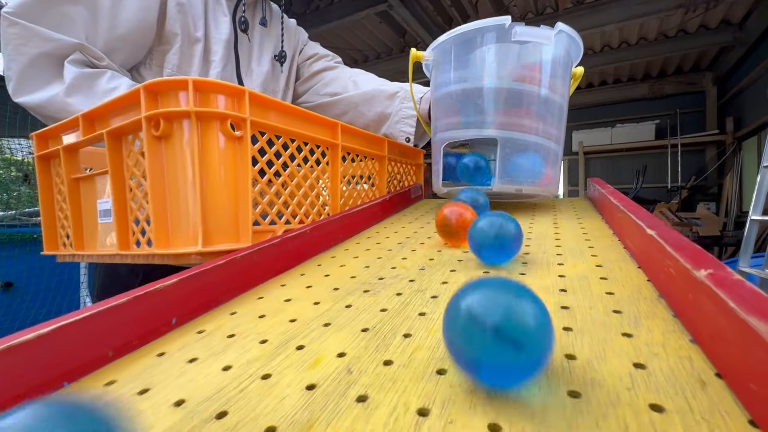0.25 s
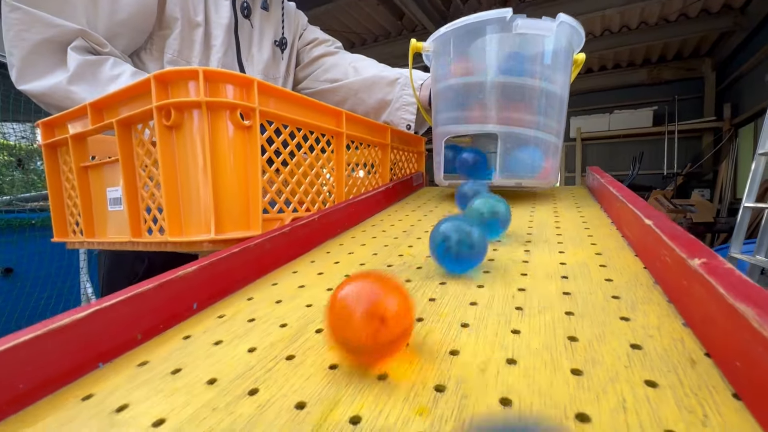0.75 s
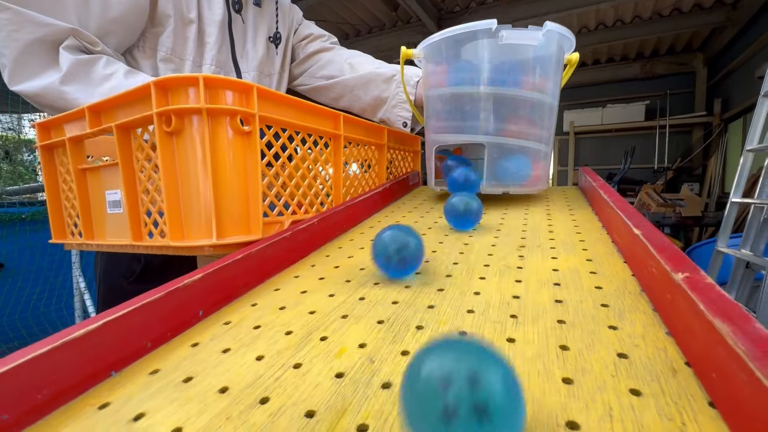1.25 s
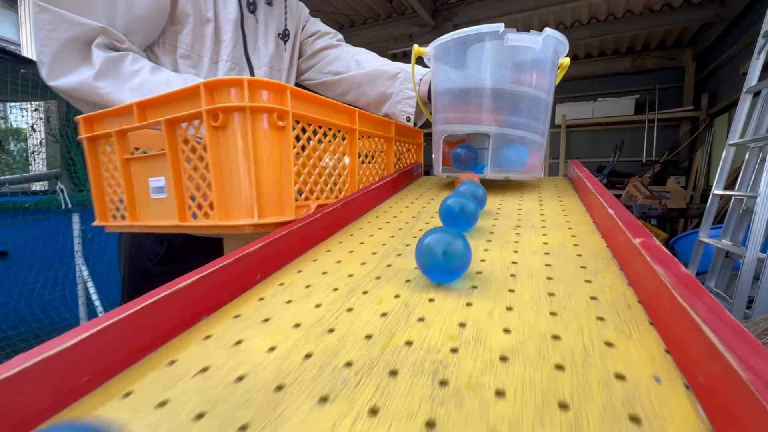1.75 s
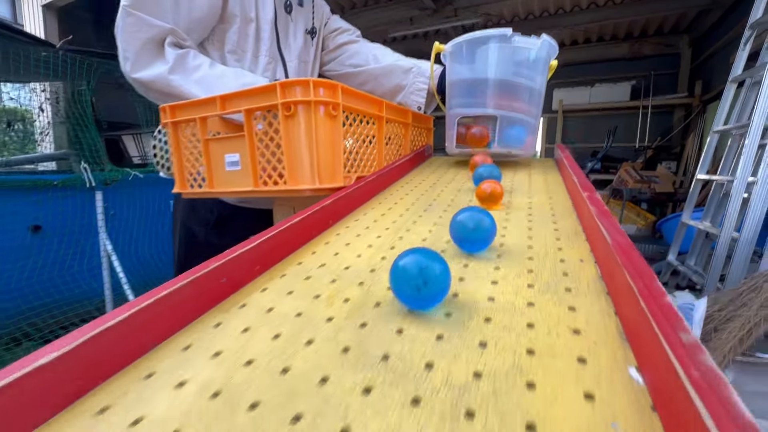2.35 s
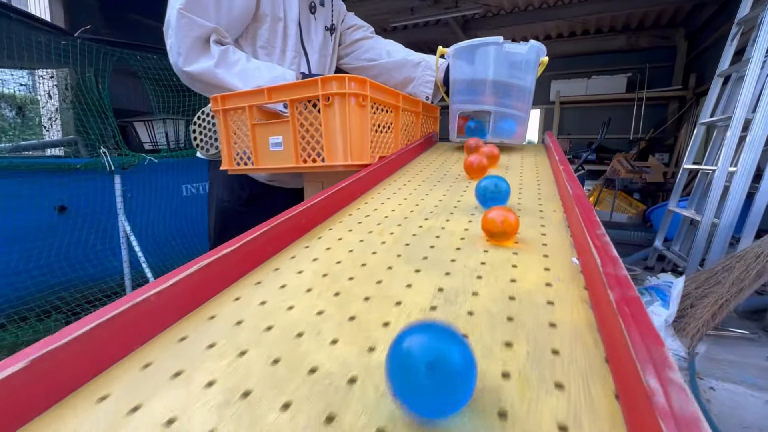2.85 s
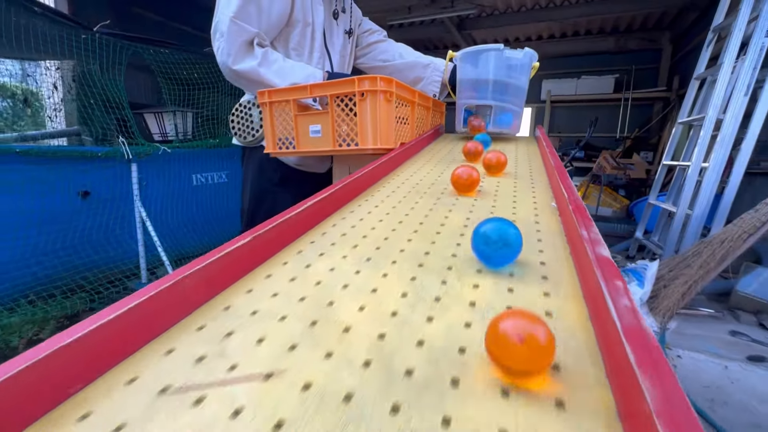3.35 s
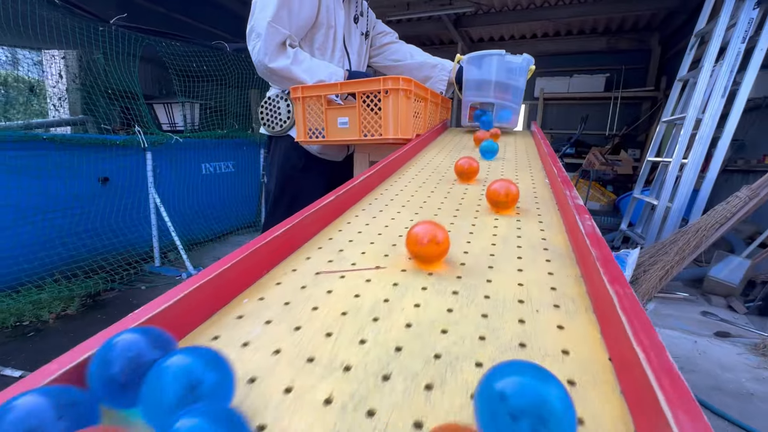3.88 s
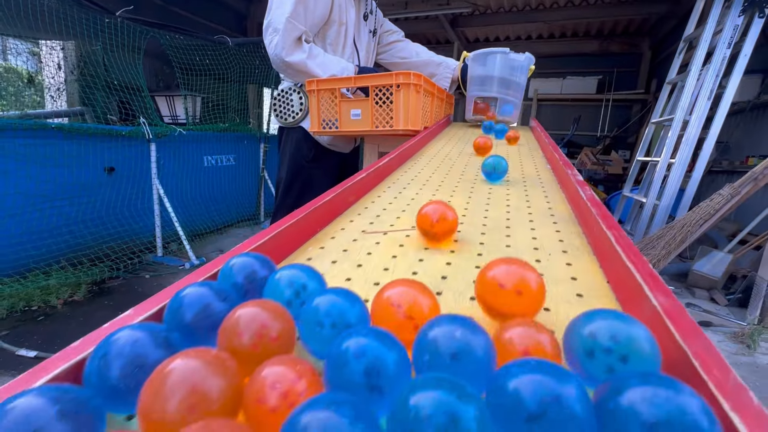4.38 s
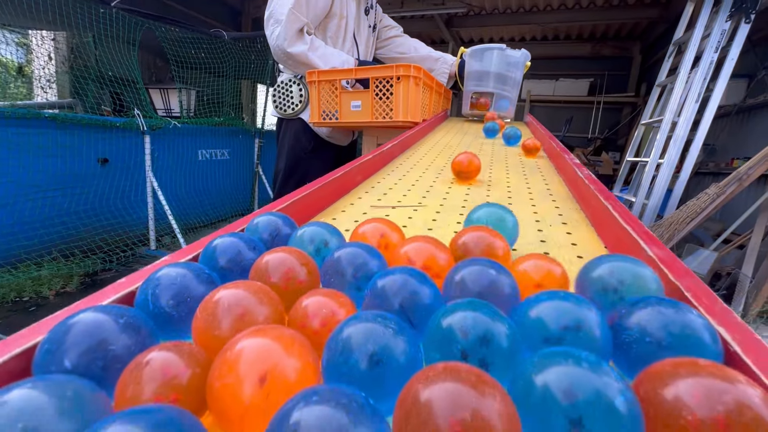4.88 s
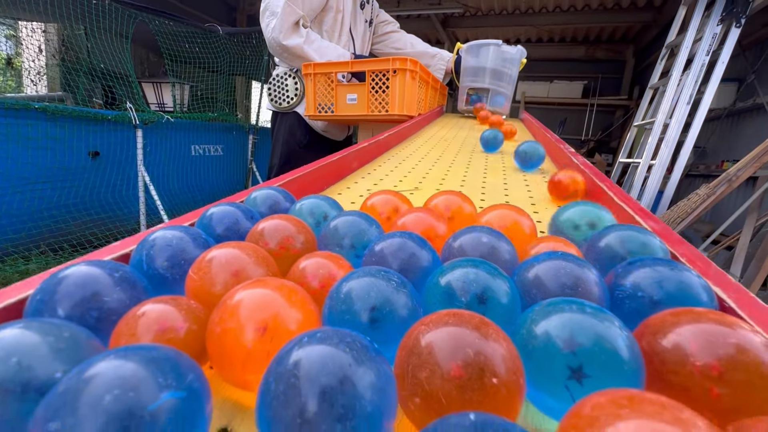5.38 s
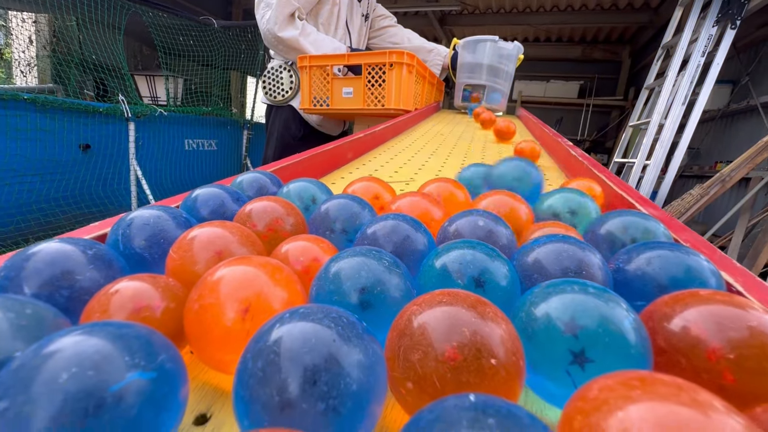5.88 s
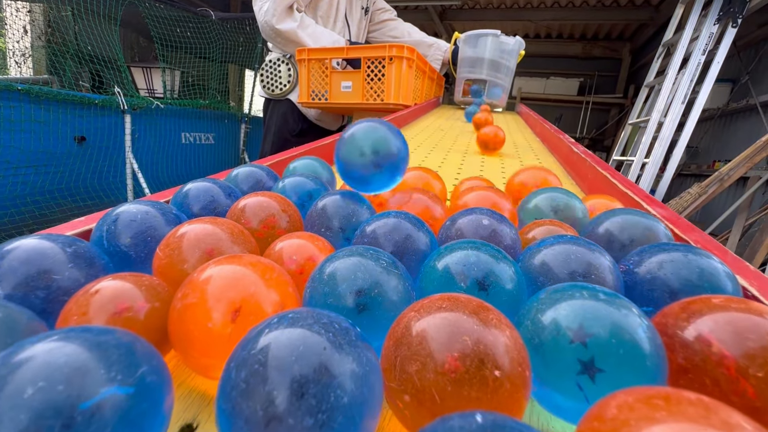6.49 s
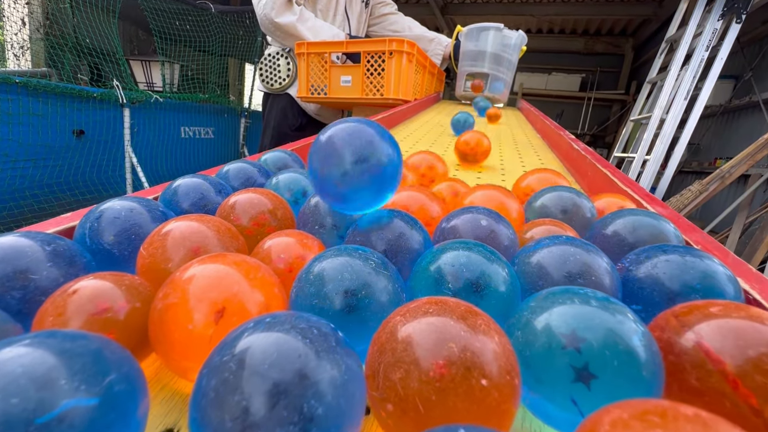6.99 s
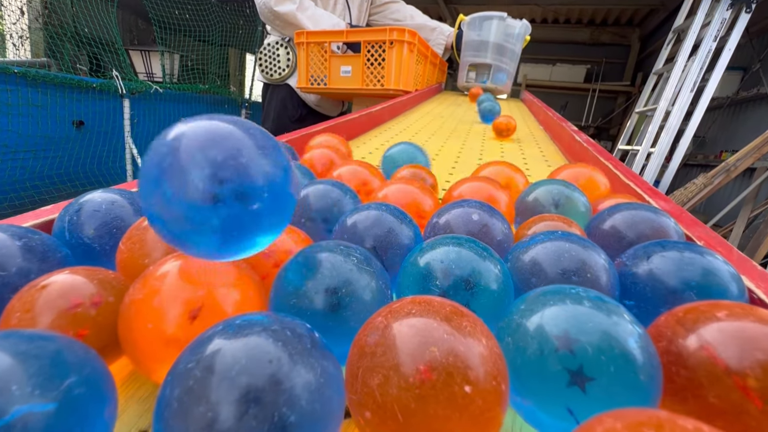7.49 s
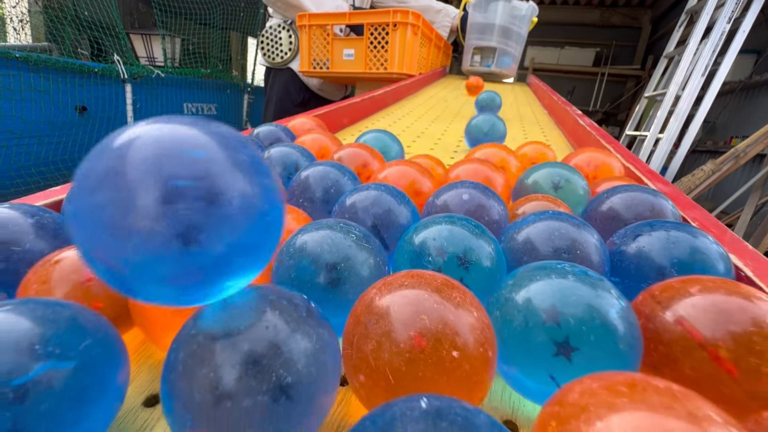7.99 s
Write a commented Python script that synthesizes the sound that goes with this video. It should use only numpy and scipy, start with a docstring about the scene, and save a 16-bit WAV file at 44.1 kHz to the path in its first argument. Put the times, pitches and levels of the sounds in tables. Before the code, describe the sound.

Close stereo sound of plastic balls tumbling down a wooden ramp in a shed. At first there are brighter ticks, thuds on bare board and audible rolling over holes; later, denser clusters of dull clacks as balls hit the packed heap. The rumble thins out, leaving knocks, and near the end a ball softly nudges the microphone.

```python
"""Dull clacks come in quick runs, each with a tick and a thud, as solid plastic balls roll down a
perforated board and knock into the heap at its foot, close to a small camera with two microphone ports.
A blow is a train of damped tones from touching balls, and its push excites the board's resonances.
Lone pairs of balls meet with a hollow clack; hard faces crack as short bursts of coloured noise.
Underneath, filtered noise and small contacts rumble and rattle as balls roll over the holes; a shed answers."""
import sys
import numpy as np
from scipy import signal
from scipy.fft import rfft, irfft, next_fast_len
from scipy.io import wavfile
from scipy.ndimage import uniform_filter1d, minimum_filter1d, map_coordinates

SR = 44100
rng = np.random.default_rng(int(sys.argv[2]) if len(sys.argv) > 2 else 0)


def wrap_up_sound(samples):
    """Save the sound to the file named by the first command line argument, as 16-bit audio."""
    columns = np.atleast_2d(samples).T
    # keep every value between -1 and 1, then stretch to whole-number steps
    tamed = np.clip(columns, -1, 1)
    steps = np.round(tamed * 32767).astype(np.int16)
    wavfile.write(sys.argv[1], SR, steps)


def elevation(decibels):
    """Turn decibel levels (scalar or array-like) into linear amplitude ratios."""
    levels = np.asarray(decibels, float)
    return 10 ** (levels / 20)


N = 363384

# Spectrum of hard faces meeting. Each row: frequency in Hz, relative spectral level in dB.
TICK_COLOUR = [(1200, -3), (2200, 3), (3300, -6.5), (4800, -15.5), (5700, -24), (7000, -20.5), (8300, -25),
               (9600, -33.5), (10200, -84.5)]


def knocks():
    """Superposition: two independent views of every jolt and tick, partly coherent at the ports."""
    # Jolts through the whole heap. Each row: start in seconds, clack level in dB,
    # thud level in dB over the clack, length in ms.
    jolts = [(0.039, -10, 0.5, 25.2), (0.212, -6.5, 1, 23.8), (0.505, -8.5, -1, 23), (0.754, -6.5, 3, 17.2),
             (1.036, -10, 1, 21.5), (1.319, -13.5, -0.5, 22.4), (1.558, -16, 3.5, 23.8),
             (1.777, -9, -2.5, 23.7), (1.825, -9.5, 0.5, 24.2), (2.023, -22, 7, 27.6),
             (2.08, -4.5, -8.5, 20.5), (2.346, -12, -4, 23.5), (2.579, -14, -6, 24),
             (2.83, -9.5, -2.5, 20.5), (3.129, -9.5, -1.5, 26.4), (3.223, -20.5, 5.5, 29.6),
             (3.297, -6, -7.5, 19.4), (3.332, -21, 8.5, 40.4), (3.421, -11.5, -0.5, 26.6),
             (3.609, -13, 1, 13.6), (3.723, -8, -4.5, 28), (3.956, -11, -2.5, 25.5), (4.14, -7, -2, 22.6),
             (4.176, -13, 2, 39), (4.228, -8.5, -1, 21.6), (4.332, -4, -1.5, 24.3), (4.471, -7, -3.5, 16.2),
             (4.504, -12.5, 7, 12), (4.541, -8.5, -7.5, 26.4), (4.569, -11.5, -0.5, 16.7),
             (4.619, -14, -1.5, 20), (4.761, -6, -4.5, 17.7), (4.846, -7, -2.5, 11.7),
             (4.928, -18, 3.5, 30.3), (5.099, -6, -5.5, 18.7), (5.249, -13, -1.5, 26),
             (5.431, -5, -7, 19.7), (5.595, -17.5, -1.5, 32.4), (5.649, -6, -7, 18.8),
             (5.789, -8, -5, 21.6), (5.833, -14, -4, 19), (5.893, -13, 1.5, 30.4), (5.944, -8.5, -3, 16.4),
             (6.123, -4, -8, 17), (6.208, -12, 1, 14.9), (6.239, -13.5, -2, 13.8), (6.398, -5.5, -2, 31.4),
             (6.514, -5.5, -11.5, 13.8), (6.53, -12, 1, 27.8), (6.573, -14, 2.5, 15.2),
             (6.741, -6, -13, 16.9), (6.833, -9.5, -5, 15.7), (6.87, -15, 2.5, 32), (6.91, -13.5, 3, 24),
             (7.128, -14.5, 4, 15.4), (7.169, -3, -6.5, 13.3), (7.296, -22.5, 7, 13.6),
             (7.329, -16, -2.5, 11.7), (7.366, -11.5, 2, 14.4), (7.5, -11.5, 2.5, 21),
             (7.569, -13.5, -2, 22.3), (7.753, -15, 4.5, 13), (7.875, -17, 1.5, 13),
             (8.1138, -5.5, -4.5, 10.2), (8.178, -23.5, 4.5, 32)]
    s, db, thud_db, length_ms = np.transpose(jolts)
    note_hz = heap(s)[1]
    view = lambda: jolt(s, db, note_hz, thud_db, length_ms) + ticks()
    return paired(view(), view())


def jolt(s, db, hz, thud_db, length_ms, count=9):
    """Impulse transfer: a jolt swells from ball to ball, then the heap settles in weaker contacts."""
    draw = rng.standard_normal((len(s), 3, count))
    # place of each contact along the jolt; below 0 leads in
    share = (np.arange(count) + rng.random((len(s), count))) / 6 - 0.25
    share = np.where(share > 0.7, 0.69 + 2.3 * (share - 0.7), share)  # the last contacts straggle
    spread_s = np.clip(length_ms - 3, 1, 80)[:, None] / 1000
    times = (s[:, None] + share * spread_s).ravel()
    swell_db = np.where(share < 0.25, -25 * (0.25 - share), -7 * np.abs(share - 0.25))
    sizes = elevation(swell_db + 1.65 * draw[:, 0])
    # the contacts share the blow's energy; a long jolt holds more of it
    blow_db = db + 5.4 * np.log10(length_ms / 15)
    sizes *= elevation(blow_db)[:, None] / np.linalg.norm(sizes, axis=1, keepdims=True)
    # a long jolt involves the whole heap and scatters its note
    loose = np.clip(length_ms / 25, 0, 1)[:, None]
    pitch = np.clip(hz[:, None] * np.exp(0.32 * loose * draw[:, 1]), 450, 2300)
    pitch[:, 2] = hz  # the third contact takes the heap's note and gains weight
    sizes[:, 2] *= elevation(6.0 - 4.3 * loose[:, 0])
    shapes = tones(pitch.ravel(), cycles=1.183, soft=0.45)
    clack = laid(times, elevation(16.0) * sizes.reshape(-1, 1) * shapes)
    # the heavy push reaches the board 1.5 ms later, either way up
    force = sizes * elevation(thud_db + 14)[:, None] * np.sign(draw[:, 2])
    push = np.hanning(SR // 900) * force.reshape(-1, 1)
    thud = board(laid(times + 0.0015, push))
    return clack + thud + rasp(s, db, length_ms)


def heap(s):
    """Growing load: share of the board covered (0-1) and note of the heap's contacts (Hz) at times s."""
    # Each row: time in seconds, share of the board covered (0-1), note of the heap in Hz.
    growth = [(0, 0, 1253), (2.801, 0.4, 1310), (4.202, 0.83, 1072), (8.24, 0.87, 1055)]
    at, share, hz = np.transpose(growth)
    return np.interp(s, at, share), np.interp(s, at, hz)


def board(push):
    """Modal resonance: causal damped modes of the board, reweighted as the heap covers it."""
    # Each row: resonance in Hz, bandwidth in Hz, level in dB when bare, level in dB when covered.
    modes = [(164, 108, -5.5, -10), (324.5, 154, -6, 3), (367.8, 61, -3.5, 7.5), (539, 184, 0.5, -3),
             (813, 190, -6.5, -4), (78, 21, -5.5, -14)]

    def response(f, column):
        total = 0
        for k, row in enumerate(modes):
            hz, width = row[:2]
            mode = 1j * f * width / (hz ** 2 - f * f + 1j * f * width)
            total = total + (-1) ** k * elevation(row[column]) * mode
        return total

    covered = heap(np.arange(N) / SR)[0]
    bare_ring = filtered(push * (1 - covered), lambda f: response(f, 2))
    covered_ring = filtered(push * covered, lambda f: response(f, 3))
    return bare_ring + covered_ring


def ticks():
    """Broadband impact: hard faces meet in a crack of noise, then a duller rasp."""
    # Each row: start in seconds, treble level in dB.
    contacts = [(0.036, -24), (0.184, -39.5), (0.2117, -21), (0.3105, -38.5), (0.5047, -23), (0.674, -40),
                (0.7537, -27), (0.916, -43.5), (0.382, -40), (1.031, -36.5), (1.319, -41.5), (1.556, -39.5),
                (1.6718, -43), (1.7722, -31.5), (1.8277, -42.5), (1.9092, -39.5), (2.077, -32.5),
                (2.146, -43.5), (2.347, -37), (2.517, -47.5), (2.5788, -41), (2.8227, -36), (3.1294, -36),
                (3.2994, -31), (3.4212, -35.5), (3.6662, -39.5), (3.724, -42), (3.761, -35.5),
                (3.7687, -35), (3.9554, -41), (4.33, -36), (4.4678, -42), (4.503, -46), (4.768, -41),
                (4.8461, -40), (5.097, -39.5), (5.4299, -37), (5.7947, -36.5), (5.8794, -44),
                (6.127, -39.5), (6.3974, -33.5), (6.7436, -43.5), (7.166, -37), (7.88, -42.5),
                (8.1086, -35), (8.198, -52)]
    s, db = np.transpose(contacts)
    body_db, rasp_ms = 29.5, 16.4  # whole tick over its treble; time in which the rasp falls 16 dB
    t = np.arange(SR // 16) / SR

    def burst(fade):
        noise = rng.standard_normal((len(s), len(t)))
        return laid(s, elevation(db + body_db)[:, None] * noise * fade * (1 - np.exp(-t / 0.0013)))

    crack = filtered(burst(elevation(-60 * t / 0.013)), lambda f: elevation(along(TICK_COLOUR, f)))
    return crack + 0.5 * filtered(burst(elevation(-16 * t / (rasp_ms / 1000))), raspy)


def rasp(s, db, length_ms):
    """Contact friction: noise under a blow, falling 16 dB over the blow's length."""
    rasp_db = -10.5  # against the clack's level
    t = np.arange(SR // 16) / SR
    fade = elevation(-16 * t / (length_ms[:, None] / 1000))
    burst = rng.standard_normal(fade.shape) * fade * (1 - np.exp(-t / 0.0017))
    return filtered(laid(s, elevation(db + rasp_db)[:, None] * burst), raspy)


def raspy(f):
    """First-order low-pass: a rasp has the tick's colour, dulled above 3300 Hz."""
    return elevation(along(TICK_COLOUR, f)) / (1 + 1j * f / 3300)


def clacks(count=3):
    """Repeated impact: a hollow contact and rebounds reach both ports alike; thuds and rasps differ."""
    # Single ball against ball. Each row: start in seconds, clack level in dB, pitch in Hz.
    pairs = [(0.2565, -10.5, 1890), (0.2608, -6.5, 1367), (0.384, -25.5, 2250), (0.7157, 0.5, 1707),
             (0.9524, -4, 1790), (1.1464, -6, 1695), (1.1665, -4, 1293), (1.4563, -16.5, 1406),
             (2.1, -8, 1450), (2.2082, -6.5, 1940), (2.2506, -8.5, 1276), (2.2597, -8.5, 1970),
             (2.4256, -5.5, 1414), (2.8859, -14.5, 1324), (2.9027, -6.5, 1277), (2.915, -7, 1760),
             (3.165, -8, 1760), (3.2016, -11, 1326), (3.669, -8.5, 1660), (3.7604, -8, 1510),
             (3.7707, -3.5, 1436), (3.914, -8.5, 710), (5.2167, -8, 1496), (5.5177, -5.5, 1550),
             (5.6743, -8.5, 1580), (5.884, -8, 1536), (6.051, -12, 945), (6.463, -9, 1013),
             (7.21, -9, 1490), (7.523, -11.5, 1650), (8.1112, -6, 1686)]
    s, db, hz = np.transpose(pairs)
    rebound_s, rebound_db = 0.003, -5  # typical wait for a rebound; change of level at each
    draw, k = rng.standard_normal((len(s), 2, count)), np.arange(count)
    times = (s[:, None] + k * rebound_s * np.exp(0.2 * draw[:, 0])).ravel()
    sizes = elevation(db[:, None] + k * rebound_db).reshape(-1, 1)
    # rebounds tend to sound duller
    pitch = (hz[:, None] * np.exp(k * (0.12 * draw[:, 1] - 0.08))).ravel()
    overtone = elevation(-12) * tones(1.75 * pitch, cycles=3, soft=3)
    hollow = tones(pitch, cycles=2, soft=1.8) + overtone
    ring = laid(times, elevation(14.5) * sizes * hollow)
    thud_db = np.interp(heap(times)[0], (0, 1), (-12.5, -3))  # bare board to covered board

    def view():
        way = np.sign(rng.standard_normal(sizes.shape))
        push = np.hanning(SR // 1100) * sizes * elevation(thud_db + 13.5)[:, None] * way
        return board(laid(times + 0.002, push)) + rasp(s, db + 1.5, np.full(len(s), 10))

    return ring + paired(view(), view())


def tones(hz, cycles, soft):
    """Damped oscillation (rows): swells over soft cycles as the plastic gives, decays over cycles."""
    u = np.arange(SR // 70) / SR * hz[:, None]
    return np.sin(2 * np.pi * u) * np.exp(-u / cycles) * (1 - np.exp(-u / soft)) ** 2


def bump():
    """Damped oscillation: a ball nudges the camera body, one slow swing."""
    start_s, level_db, swing_hz = 8.125, -22.5, 56
    u = np.clip(np.arange(N) / SR - start_s, 0, None) * swing_hz
    return elevation(level_db) * np.sin(2 * np.pi * u) * np.exp(-u / 1.1)


def rolling():
    """Random excitation: the board hums and the heap shifts; close balls rumble and rattle over holes."""
    # Each row: time in seconds, rolling level in dB, low rumble level in dB.
    levels = [(0.0, -26, -30), (7.3, -36.5, -61.5), (8.24, -38.5, -60)]
    # Spectra of the hum and the rumble. Each row: frequency in Hz, relative spectral level in dB.
    hum_colour = [(60, -23), (120, -6.5), (480, -3.5), (850, -13), (1280, -11.5), (1700, -20.5),
                  (4900, -43), (5700, -51.5), (7300, -49), (8300, -54), (8800, -83)]
    rumble_colour = [(15, -26.5), (75, -4), (150, -17.5), (300, -68.5)]
    roll_db, low_db = curves(levels)
    noise = rng.standard_normal((4, N))
    hum = filtered(noise[:2] * elevation(2.8 * wobble(90)), lambda f: elevation(along(hum_colour, f)))
    low = filtered(noise[2:] * elevation(2.9 * wobble(6.5)), lambda f: elevation(along(rumble_colour, f)))
    shifts = patter(roll_db + 11.0, hz=788, count=800)
    rattle = patter(low_db + 1.5, hz=2220, count=1600)
    return elevation(roll_db) * unit(paired(*hum)) + elevation(low_db) * unit(paired(*low)) + shifts + rattle


def patter(db, hz, count):
    """Random impacts: small contacts scattered around a pitch, at a level that follows db."""
    s = rng.random(count) * N / SR
    extra_db = 1.97 * np.minimum(rng.exponential(size=count), 3)
    size = elevation(db[(s * SR).astype(int)] + extra_db)[:, None]

    def view():
        pitch = hz * np.exp(0.3 * rng.standard_normal(count))
        return laid(s, size * tones(pitch, cycles=1.96, soft=0.91))

    return paired(view(), view())


def shed(x):
    """Reverberation: each frequency of the shed's delayed answer decays at its own rate."""
    # Each row: frequency in Hz, time to fall 60 dB in seconds.
    decay = [(200, 0.58), (3000, 0.089)]
    hz, t, z = signal.stft(rng.standard_normal((2, SR // 3)), SR, nperseg=256)
    fade = elevation(-60 * t / along(decay, hz)[:, None])
    tail = signal.istft(z * fade, SR, nperseg=256)[1]
    late = np.pad(x, ((0, 0), (300, 0)))  # 300 samples, about 7 ms
    return signal.fftconvolve(late, tail / np.linalg.norm(tail[0]), axes=1)[:, :N]


def paired(a, b):
    """Coherence: left and right from two unrelated sounds, alike by frequency."""
    # Each row: frequency in Hz, left-right likeness (0-1).
    likeness = [(40, 0.94), (150, 0.38), (4300, 0.06), (4800, 0.67), (9000, 0.96)]
    turn = lambda hz: np.arccos(np.clip(along(likeness, hz), -1, 1)) / 2
    mid, side = filtered(np.array([a, b]), lambda hz: np.array([np.cos(turn(hz)), np.sin(turn(hz))]))
    return np.array([mid + side, mid - side])


def laid(start_s, shapes):
    """Superposition: the sum of short shapes (rows) placed at their start times."""
    first = np.clip(np.round(start_s * SR).astype(int), 0, N)
    at = first[:, None] + np.arange(shapes.shape[1])
    return np.bincount(at.ravel(), shapes.ravel(), N + SR)[:N]


def filtered(x, response):
    """Linear filtering: the spectrum of x times a complex response of frequency."""
    m = next_fast_len(N + SR // 4)
    return irfft(rfft(x, m) * response(np.fft.rfftfreq(m, 1 / SR)), m)[..., :N]


def wobble(rate):
    """Slow random modulation: a smooth curve through rate random knots a second."""
    knots = rng.standard_normal(int(N * rate / SR) + 4)
    return map_coordinates(knots, [np.arange(N) * rate / SR])


def curves(rows):
    """Linear interpolation in time: one value per sample for each column after the time."""
    s, *cols = np.transpose(rows)
    return [np.interp(np.arange(N) / SR, s, c) for c in cols]


def along(points, hz):
    """Interpolation of (Hz, value) points on a logarithmic frequency axis."""
    f, v = np.transpose(points)
    return np.interp(np.log(hz + 1), np.log(f + 1), v)


def unit(x):
    """Power normalization: x scaled to rms 1."""
    return x / np.sqrt(np.mean(x ** 2) + 1e-20)


def scene():
    """Superposition: blows, their echo (fainter for the close lone clacks), the nudge and the rolling."""
    blows, lone = knocks(), clacks()
    echo = elevation(-12) * shed(blows + elevation(-7) * lone)
    return blows + lone + echo + rolling() + bump()


def top_cut(x):
    """Nothing passes above the cut-off."""
    return signal.sosfilt(signal.butter(12, 9790, fs=SR, output="sos"), x)


def record(dry):
    """Transfer functions: the ports differ in colour and phase; a fast limiter holds the loudest blows."""
    # Each row: frequency in Hz, left over right in dB.
    port_db = [(30, 5), (300, 10), (1000, -2.5), (3000, 6), (5200, -0.5)]
    # Each row: frequency in Hz, lead of the left port in radians.
    port_phase = [(100, 1), (230, -3), (620, 1.5), (4300, 27), (5450, 22), (9500, 14.6)]

    def tilt(f):
        """Half of the difference between the ports; the right port takes the inverse."""
        lead = np.interp(f, *np.transpose(port_phase))
        return elevation(along(port_db, f) / 2) * np.exp(0.5j * lead)

    x = filtered(dry, lambda f: np.array([tilt(f), 1 / tilt(f)]))
    needed = np.minimum(1, 0.92 / (np.abs(x) + 1e-9))
    gain = uniform_filter1d(minimum_filter1d(needed, size=261), size=130)  # sizes in samples
    return top_cut(x * gain)


dry = scene()
out = record(dry)
wrap_up_sound(out)
```